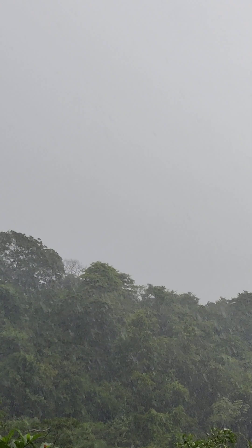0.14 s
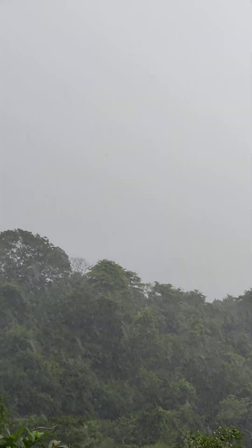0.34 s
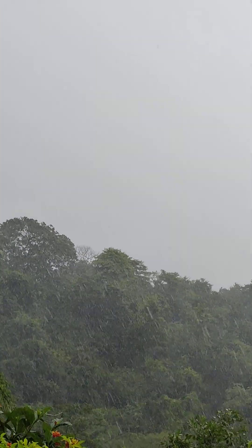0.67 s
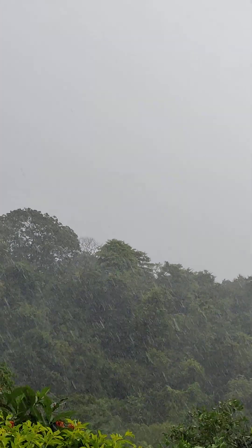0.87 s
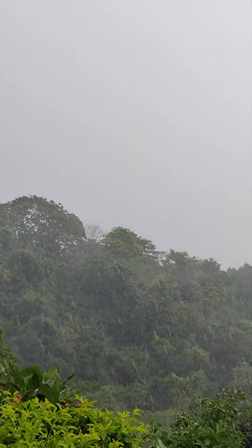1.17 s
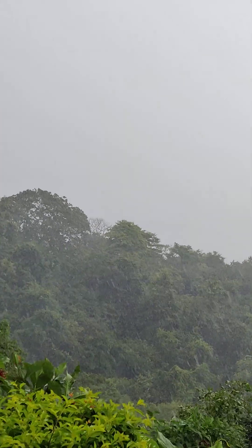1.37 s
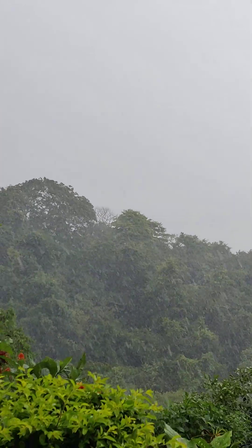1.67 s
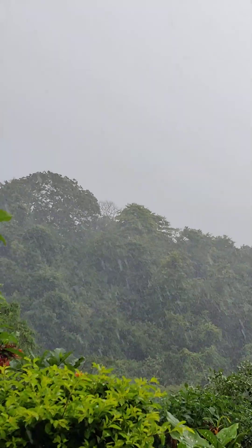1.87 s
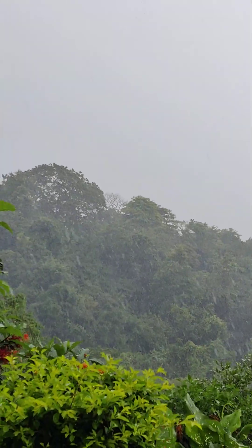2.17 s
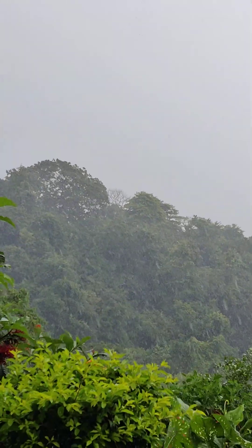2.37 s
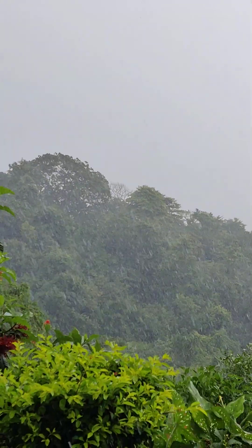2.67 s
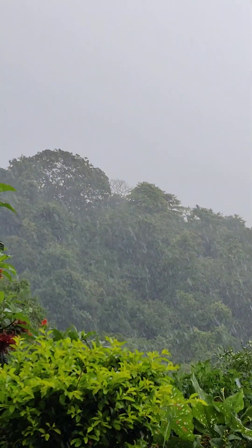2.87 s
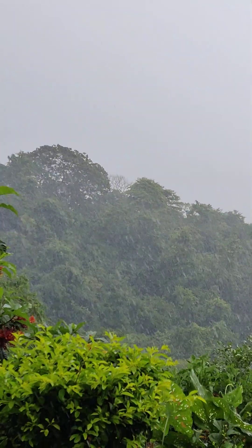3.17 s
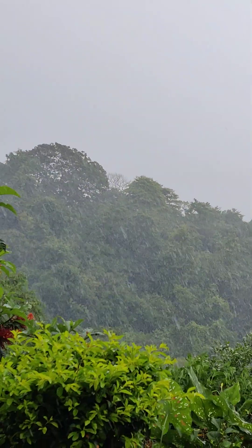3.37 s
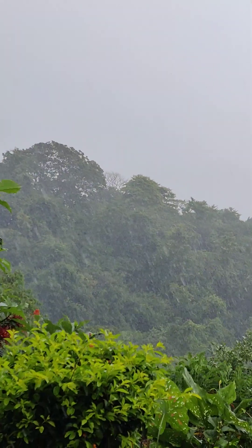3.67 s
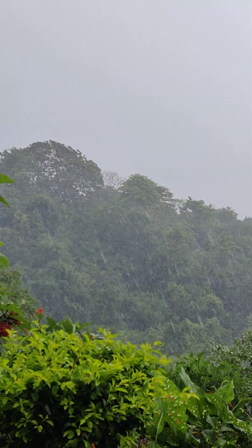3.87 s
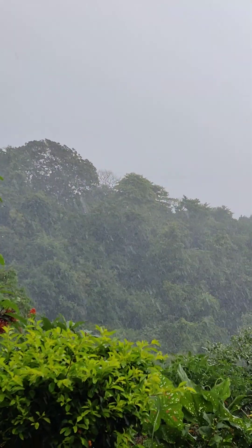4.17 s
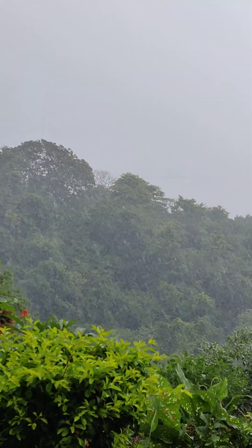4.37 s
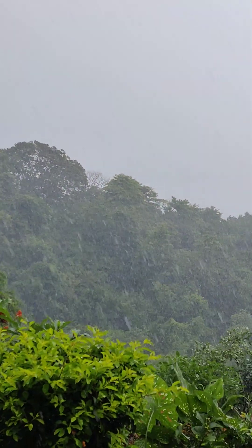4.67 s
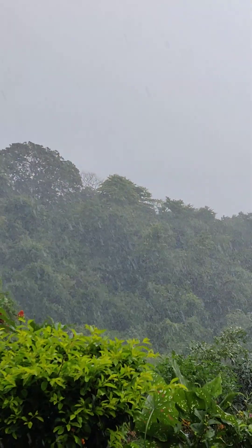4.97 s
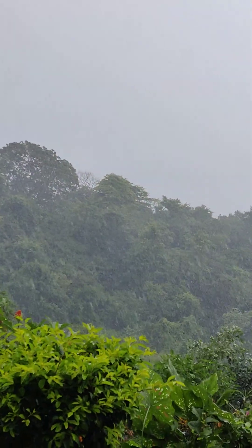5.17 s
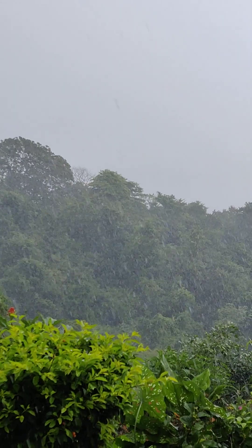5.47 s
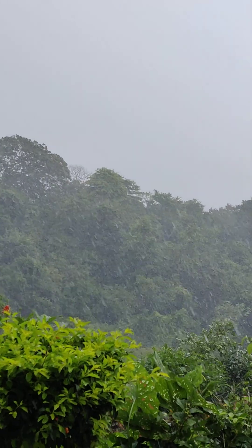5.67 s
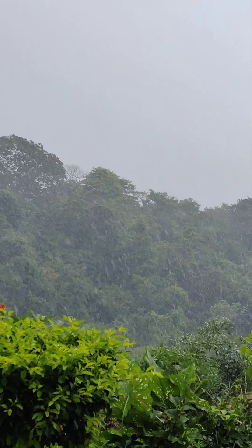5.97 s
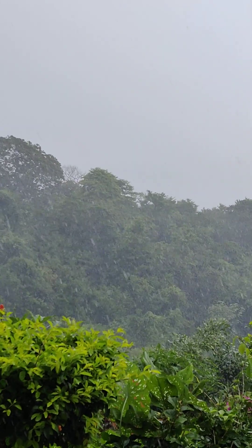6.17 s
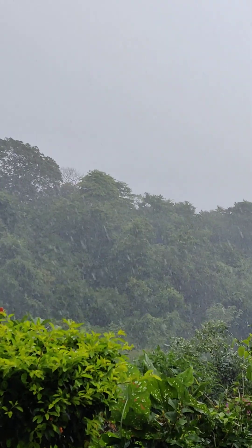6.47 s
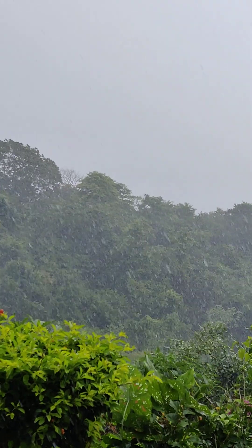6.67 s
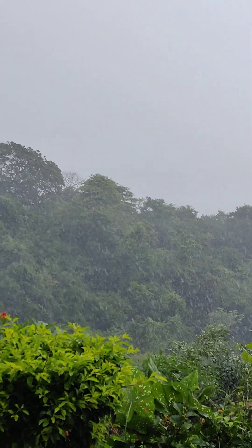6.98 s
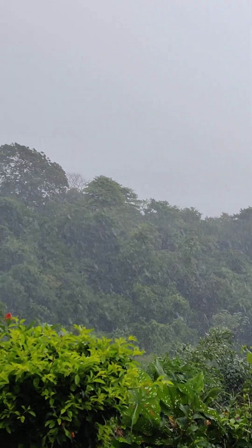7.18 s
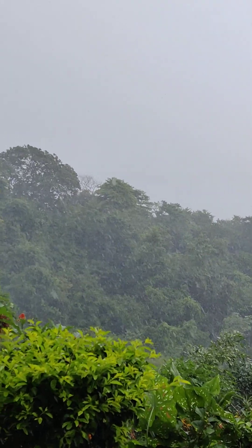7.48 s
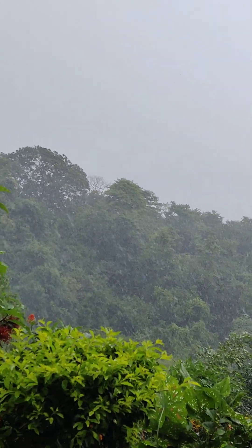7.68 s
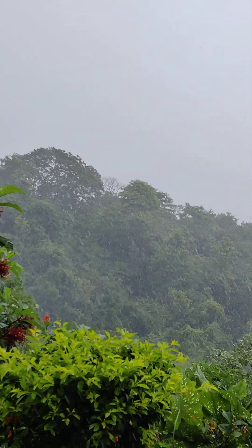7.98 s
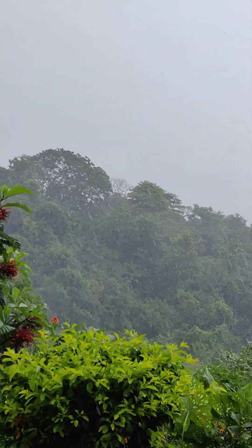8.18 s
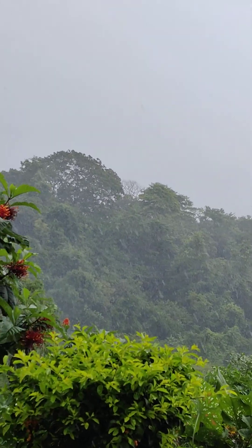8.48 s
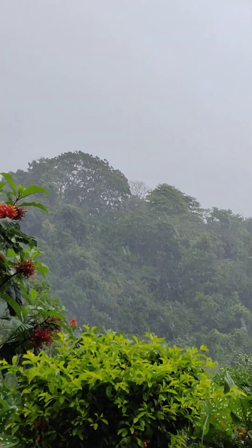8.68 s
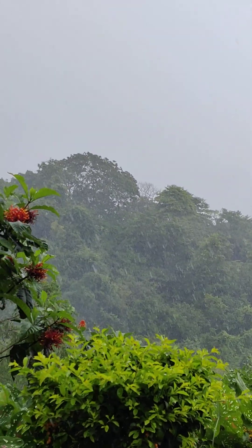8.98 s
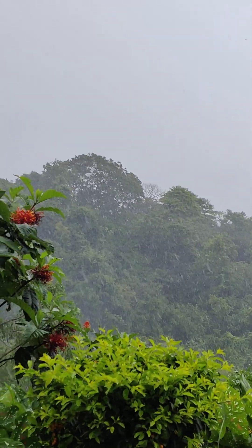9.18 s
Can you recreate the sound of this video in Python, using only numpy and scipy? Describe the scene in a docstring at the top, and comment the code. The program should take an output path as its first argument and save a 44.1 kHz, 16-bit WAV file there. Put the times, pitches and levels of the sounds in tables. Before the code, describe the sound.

Outdoors in thick greenery, a continuous downpour patters densely all around, full in the middle range with a soft leafy top. Low turbulence rumbles separately at each side of a phone's microphones, with clusters of muffled thumps, left early and right later. A distant motor drones weakly beneath, coming and going. The bush patter thins in the later part while the rain continues to the end.

```python
"""A wide, nearly even hiss: heavy rain on a wooded slope, heard by a phone with a port at each end.
The hiss is dense noise impacts, coloured by soil and broad leaves, small leaves and a near bush.
Low noise buffets each port on its own and pressure bumps thump one port at a time.
A far motor hums as a wavering tone with a faint third harmonic; a few close droplets tick as short noise."""
import sys
import numpy as np
from scipy import signal
from scipy.fft import rfft, irfft, next_fast_len
from scipy.io import wavfile
from scipy.ndimage import uniform_filter1d, map_coordinates

SR = 44100
rng = np.random.default_rng(int(sys.argv[2]) if len(sys.argv) > 2 else 0)


def bounce(signal):
    """Save signal as a 16-bit WAV file at the path given by the first command-line argument."""
    frames = np.transpose(np.atleast_2d(signal))
    limited = np.clip(frames, -1, 1)
    pcm = np.round(limited * 32767).astype(np.int16)
    wavfile.write(sys.argv[1], SR, pcm)


N = 411894


def amp(db):
    """Level in dB to linear gain."""
    return 10 ** (np.asarray(db) / 20)


def unit(x):
    """Scale to rms 1."""
    return x / np.sqrt(np.mean(x ** 2) + 1e-20)


def along(points, hz):
    """Interpolate (Hz, value) points on a log frequency axis."""
    points_hz, values = np.transpose(points)
    return np.interp(np.log(hz + 1), np.log(points_hz + 1), values)


def curves(rows):
    """One value per sample for each column after the time."""
    times_s, *columns = np.transpose(rows)
    return [np.interp(np.arange(N) / SR, times_s, column) for column in columns]


def wobble(knots_per_s):
    """Smooth random curve through normally distributed knots."""
    knots = rng.standard_normal(int(N * knots_per_s / SR) + 4)
    return map_coordinates(knots, [np.arange(N) * knots_per_s / SR])


def filtered(x, response):
    """Multiply the spectrum of x by a response of frequency."""
    size = next_fast_len(N + SR // 2)
    hz = np.fft.rfftfreq(size, 1 / SR)
    return irfft(rfft(x, size) * response(hz), size)[..., :N]


def drops(spectrum, spread_db, patchy_db):
    """Dense impacts from all sides, a little more from the left, coloured by what they strike; rms 1."""
    port_gap_m, sound_m_per_s = .172, 343
    aside_db, lead_s = -13.5, 0.00033  # left-side rain: relative level, earlier arrival at the left port

    drop_sizes = amp(spread_db * rng.standard_normal((3, N)))
    impacts = rng.standard_normal((3, N)) * drop_sizes

    # level patches shared by all three streams, smoothed over frequency, then time
    bins = signal.stft(impacts, nperseg=512)[2]
    patches = uniform_filter1d(rng.standard_normal(bins.shape[1:]), size=6, axis=0)
    patches = uniform_filter1d(patches, size=14, axis=1)
    *pair, aside = signal.istft(bins * amp(patchy_db * unit(patches)), nperseg=512)[1][:, :N]

    def mid_side_response(hz):
        # sound from every direction correlates at two ports as sin(kd) / kd
        correlation = .96 * np.sinc(2 * hz * port_gap_m / sound_m_per_s)
        angle = np.arccos(correlation) / 2
        return amp(along(spectrum, hz)) * [np.cos(angle), np.sin(angle)]

    def aside_response(hz):
        # half the lead as an advance on the left, half as a delay on the right
        shift = np.exp(1j * np.pi * hz * lead_s * np.array([[1], [-1]]))
        return amp(along(spectrum, hz) + aside_db) * shift

    mid, side = filtered(np.array(pair), mid_side_response)
    return unit(np.array([mid + side, mid - side]) + filtered(aside, aside_response))


def rain():
    """Three drop layers swell slightly together as sheets of rain pass; the bush stands to the right."""
    # layer levels: start_s, body_db, patter_db, bush_db
    rain_levels = [(0, -32.5, -33.5, -36.5), (.8, -32.5, -32, -36.5), (1.6, -32.5, -33, -35.5),
                   (2.4, -31.5, -32.5, -36.5), (3.2, -32, -33, -35.5), (4, -31, -33, -35),
                   (4.8, -31.5, -33, -35), (5.4, -31.5, -32, -36), (5.7, -30.5, -32.5, -39),
                   (6.2, -32, -33, -40.5), (6.8, -32, -33.5, -40), (7.6, -32, -33.5, -40.5),
                   (8.4, -32.5, -34.5, -39.5), (9.34, -32.5, -34.5, -43)]
    # drops on soil and broad leaves: freq_hz, relative_db_per_hz
    body_spectrum = [(15, -6.5), (60, -12), (125, -7), (180, -9.5), (215, -13), (270, -10.5), (400, -10),
                     (550, -6), (670, -2.5), (770, -2), (950, -4.5), (1500, -9), (2000, -14), (3300, -92)]
    # drops on small leaves: freq_hz, relative_db_per_hz
    patter_spectrum = [(600, -30.5), (1000, -8), (1420, -9), (2150, -6.5), (2750, -8), (3400, -9.5),
                       (4200, -13), (5100, -13.5), (6260, -12.5), (7870, -23), (8620, -33), (8920, -39),
                       (13400, -42.5), (15200, -50)]
    # drops on a near bush: freq_hz, relative_db_per_hz
    bush_spectrum = [(700, -35), (1300, -6.5), (1800, -3), (2200, -3), (2700, -9.5), (4000, -38),
                     (8000, -70)]
    # the phone's shell shades the ports: freq_hz, left_minus_right_db
    shell_lean = [(60, 1), (140, 1), (330, 2), (730, 1.5), (1100, 0), (1700, 0.5), (2200, -1.5), (3000, 0),
                  (4500, 2), (6000, 2), (6900, -1), (9000, .5)]

    body_db, patter_db, bush_db = curves(rain_levels) + 0.5 * wobble(3.11) + 0.11 * wobble(18)
    body = amp(body_db) * drops(body_spectrum, spread_db=0.23, patchy_db=-0.16)
    patter = amp(patter_db) * drops(patter_spectrum, spread_db=1.5, patchy_db=1.03)
    bush = amp(bush_db + [[-2.5], [2.5]]) * drops(bush_spectrum, spread_db=3.5, patchy_db=0.5)
    shaded = filtered(body + patter, lambda hz: amp(along(shell_lean, hz) * [[.5], [-.5]]))
    return bush + shaded


def wind():
    """Lumpy low turbulence, unrelated between the ports; each port has quick swells of its own."""
    # buffeting: start_s, left_db, right_db
    wind_levels = [(0, -46, -53), (.4, -51, -53), (1.4, -47, -47), (1.7, -38, -42), (1.9, -37, -42),
                   (2.05, -37, -38), (2.3, -38, -39), (2.5, -40, -44), (2.7, -40, -38), (2.85, -42, -41),
                   (3.05, -36, -42), (3.2, -38, -42), (3.3, -44, -45), (3.45, -39, -45), (3.9, -43, -43),
                   (4.4, -42, -42), (4.75, -43, -48), (4.9, -38, -39), (5.25, -40, -37), (5.5, -37, -36),
                   (5.75, -39, -40), (6.2, -43, -34.5), (6.5, -37, -41), (6.7, -41, -37), (7.2, -36, -35),
                   (7.4, -38, -38), (7.7, -47, -48), (8.3, -45, -45), (8.5, -44, -38), (8.9, -46, -42),
                   (9.15, -42, -38), (9.34, -42, -47)]
    # turbulence spectrum: freq_hz, relative_db_per_hz
    eddy_spectrum = [(8, -30), (18, 9.5), (40, 8.5), (80, -1.5), (160, -15.5), (400, -58.5)]
    lump_db, lumps_per_s = 2.9, 13  # knot deviation, knot rate
    swell_db, swells_per_s = 2, 6.3

    lumps = amp(lump_db * np.array([wobble(lumps_per_s), wobble(lumps_per_s)]))
    turbulence = lumps * rng.standard_normal((2, N))
    low_noise = filtered(turbulence, lambda hz: amp(along(eddy_spectrum, hz)))
    buffet = [unit(port) for port in low_noise]
    swells = swell_db * np.array([wobble(swells_per_s), wobble(swells_per_s)])
    return amp(curves(wind_levels) + swells) * buffet


def hum():
    """Far motor: a slightly unsteady low tone with a faint third harmonic, alike at both ports."""
    # rms levels before the waver: start_s, tone_db, third_harmonic_db
    hum_levels = [(0, -42.5, -66), (.25, -55, -62), (.6, -55, -66), (.95, -47, -64), (1.6, -48, -68),
                  (2.1, -47.5, -68), (2.6, -51, -70), (2.9, -48, -64), (3.2, -49, -64), (3.4, -60, -64),
                  (3.6, -48.5, -64), (4.2, -49, -57), (4.45, -56, -68), (4.8, -51, -61), (5.2, -40, -60),
                  (5.65, -49, -65), (6.0, -54, -64), (6.4, -42, -54), (6.65, -42.5, -56), (6.8, -47, -57),
                  (7.0, -43, -61), (7.4, -42, -64), (7.6, -48, -64), (8.0, -40.5, -68), (8.45, -50, -66),
                  (8.8, -43, -55), (9.34, -42, -55.5)]
    start_hz, fall_hz_per_s = 87.8, .25
    pitch_waver_hz, level_waver_db = 0.26, 1.1  # knot deviations

    pitch_hz = start_hz - fall_hz_per_s * np.arange(N) / SR + pitch_waver_hz * wobble(6)
    phase = 2 * np.pi * np.cumsum(pitch_hz) / SR
    tone, third = amp(curves(hum_levels) + level_waver_db * wobble(5))
    return np.sqrt(2) * (tone * np.sin(phase) + third * np.sin(3 * phase))


def ticks():
    """A droplet bursting nearby is a very short, thin click: decaying band noise."""
    # fine spray close by: start_s, initial_rms_db, left_minus_right_db, centre_hz, t60_ms
    tick_events = [(0.414, -57, -1, 11000, 20), (0.571, -47, -3, 14000, 3), (2.498, -51, -3, 12000, 3),
                   (4.040, -52, -1, 12000, 4), (5.556, -53, 0, 12000, 4), (5.734, -53, 0, 12000, 4)]
    width_hz = 2500  # Gaussian half-width at 1/e

    out = np.zeros((2, N))
    t = np.arange(SR // 20) / SR
    freq_hz = np.fft.rfftfreq(len(t), 1 / SR)
    for start_s, level_db, lean_db, centre_hz, t60_ms in tick_events:
        band = np.exp(-((freq_hz - centre_hz) / width_hz) ** 2)
        thin_noise = unit(irfft(rfft(rng.standard_normal(len(t))) * band, len(t)))
        decay = amp(level_db - 60 * t * 1000 / t60_ms)
        port_gains = amp([[lean_db / 2], [-lean_db / 2]])
        out[:, round(start_s * SR):][:, :len(t)] += decay * thin_noise * port_gains
    return out


def thumps():
    """Each eddy is a pointed pressure bump with a steep front; the vented capsule swings back around it."""
    # eddies striking a port, level before the filter:
    # peak_s, peak_db, width_ms, sign (push 1, suck -1), port (0 left, 1 right)
    thump_events = [(1.714, -25, 5, 1, 0), (1.862, -23, 8, 1, 0), (1.894, -15, 4.6, -1, 0),
                    (1.901, -14, 9.3, 1, 0), (1.944, -25, 6.5, 1, 0), (1.992, -20, 8, -1, 0),
                    (2.009, -28, 5, 1, 0), (2.034, -26, 7, 1, 0), (2.080, -24, 4.7, 1, 0),
                    (2.233, -24, 5.4, -1, 0), (2.239, -24, 3.2, 1, 0), (2.356, -30, 8, 1, 0),
                    (2.402, -18, 9, -1, 0), (2.421, -23, 8, 1, 0), (2.459, -27, 7, -1, 0),
                    (2.484, -26, 9, 1, 0), (2.500, -26, 7, -1, 0), (2.515, -14.5, 8.5, 1, 0),
                    (2.562, -23, 8, 1, 0), (2.677, -25, 7, -1, 1), (2.933, -29, 8, -1, 0),
                    (2.952, -20, 14, 1, 0), (2.989, -23, 2.7, 1, 0), (3.005, -28, 6, 1, 0),
                    (3.037, -25, 9, 1, 0), (3.079, -26, 8, -1, 0), (3.156, -24, 6.6, 1, 1),
                    (4.037, -24, 5.8, 1, 1), (4.059, -21, 8.7, -1, 1), (4.734, -15, 15, 1, 0),
                    (5.018, -21, 8, 1, 1), (5.034, -23, 6.5, 1, 1), (5.059, -20, 7.5, -1, 1),
                    (5.087, -19, 12, 1, 1), (5.108, -25, 7, -1, 1), (5.124, -18, 5.5, 1, 1),
                    (5.142, -12, 3.7, 1, 1), (5.149, -16.5, 2.8, -1, 1), (5.201, -24, 8, 1, 1),
                    (5.262, -26, 4.2, 1, 1), (5.280, -24, 6, -1, 1), (5.297, -21, 5.8, 1, 1),
                    (5.356, -27, 9, 1, 1), (5.369, -25, 7, -1, 0), (5.402, -14, 6, 1, 1),
                    (5.427, -23, 6, 1, 0), (5.430, -15, 3.8, 1, 1), (5.443, -14, 5, -1, 1),
                    (5.452, -13.5, 12, 1, 1), (5.467, -18, 8, -1, 1), (5.508, -27, 6, 1, 1),
                    (5.556, -27, 8, 1, 1), (5.583, -26, 5, 1, 1), (5.693, -20, 6.6, 1, 1),
                    (5.782, -25, 6, 1, 1), (5.826, -25, 10, -1, 0), (5.921, -24.5, 10, 1, 1),
                    (6.009, -21, 5.8, 1, 0), (6.129, -23, 12, 1, 1), (6.203, -26, 7, 1, 1),
                    (6.253, -29, 7.5, 1, 1), (6.486, -25, 8, 1, 0), (6.658, -26, 9, 1, 1),
                    (6.68, -23, 5.4, -1, 1), (6.985, -21, 7, 1, 1), (7.041, -25, 5.5, 1, 1),
                    (7.179, -25, 10, 1, 1), (7.227, -25, 5.1, 1, 1), (7.255, -17, 4.7, 1, 1),
                    (7.334, -22, 6.4, 1, 1), (7.435, -25, 6.8, 1, 1), (8.661, -17.5, 6.3, 1, 1),
                    (9.218, -28, 8, -1, 0)]

    out = np.zeros((2, N))
    half = SR // 20
    t = np.arange(-half, half) / SR
    for peak_s, peak_db, width_ms, sign, port in thump_events:
        side_width_ms = width_ms * np.where(t < 0, .45, .95)  # front, tail
        u = np.abs(t * 1000 / side_width_ms) ** 1.41
        bump = (1 - u) * np.exp(-u / 2)
        out[int(round(port)), round(peak_s * SR) - half:][:len(t)] += np.sign(sign) * amp(peak_db) * bump
    # 14 Hz low cut, 450 Hz high cut
    return filtered(out, lambda hz: hz ** 2 / (hz ** 2 + 14 ** 2) / (1 + (hz / 450) ** 4))


def scene():
    """Sum of all sources at the two ports."""
    return rain() + wind() + hum() + ticks() + thumps()


def record(dry):
    """The phone keeps nothing above its band limit."""
    top_hz = 15250
    return filtered(dry, lambda hz: hz < top_hz)


dry = scene()
out = record(dry)
bounce(out)
```